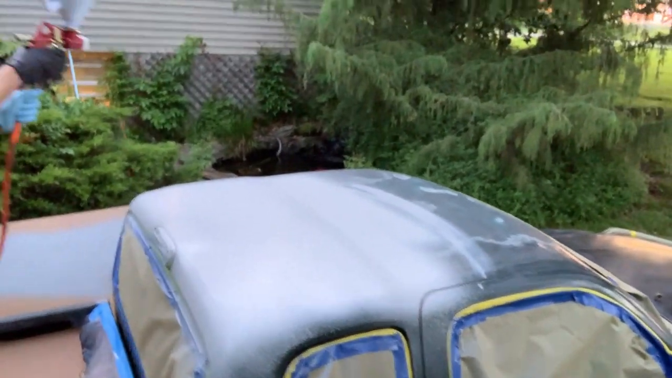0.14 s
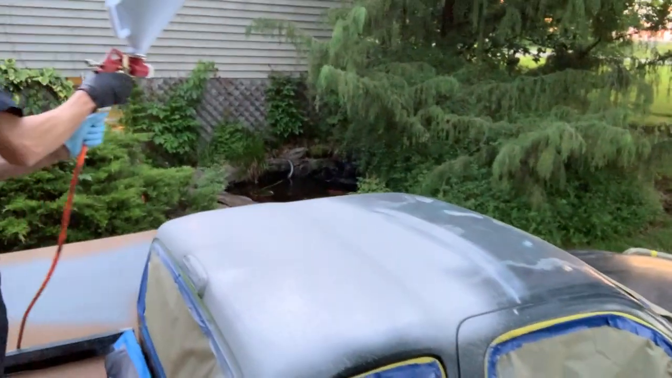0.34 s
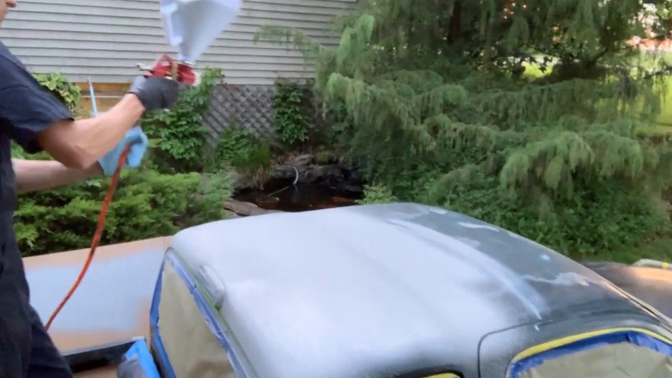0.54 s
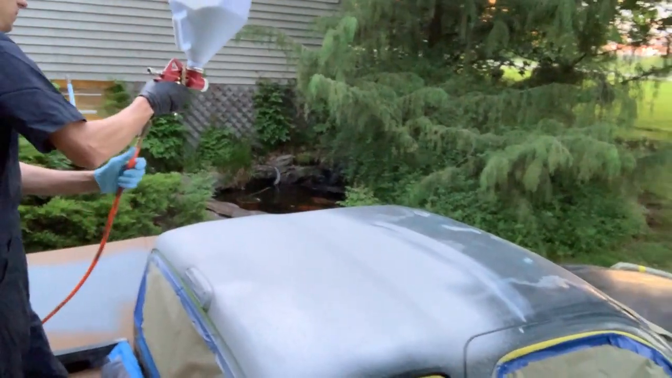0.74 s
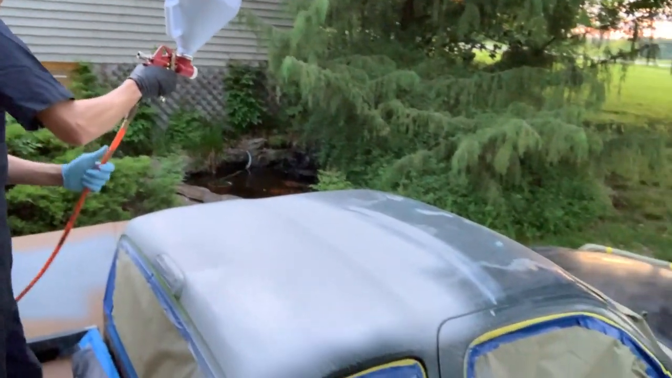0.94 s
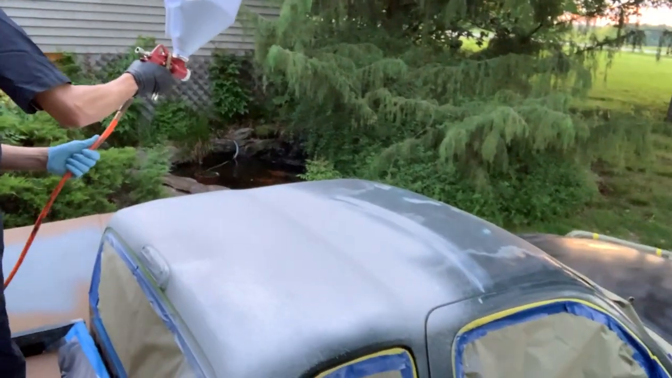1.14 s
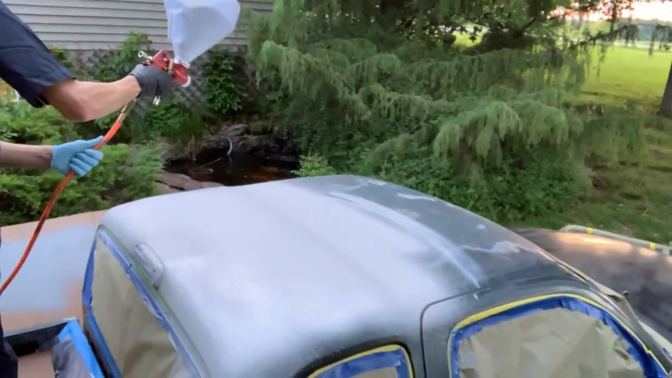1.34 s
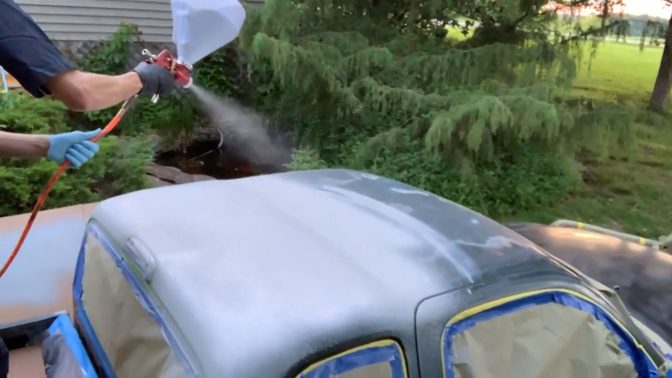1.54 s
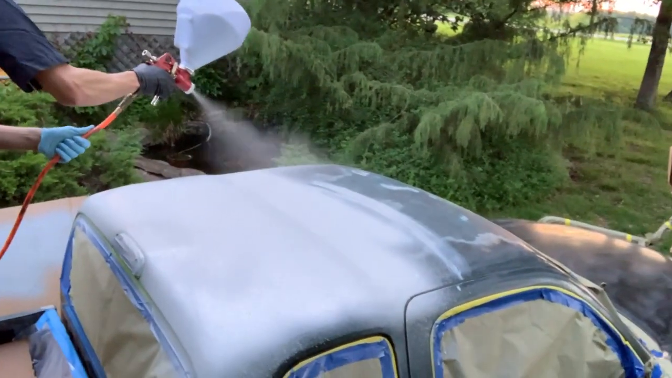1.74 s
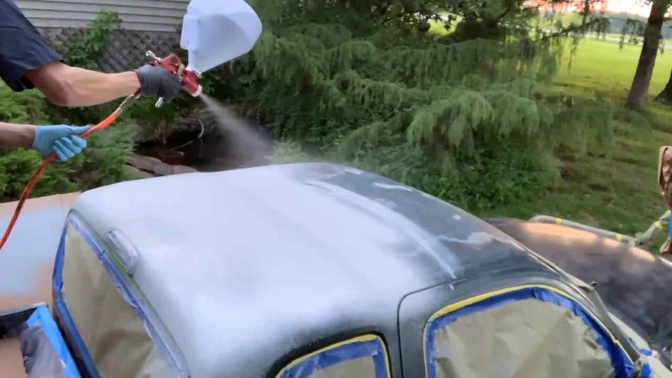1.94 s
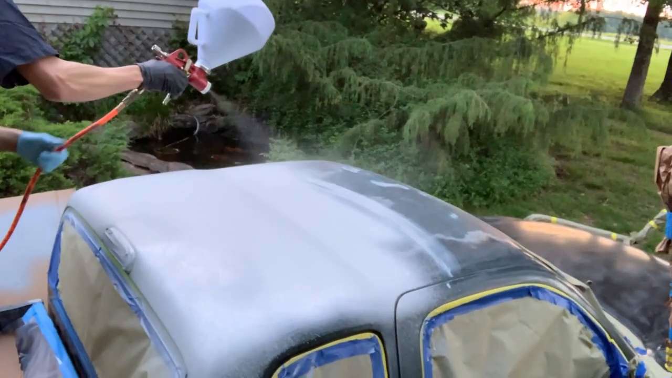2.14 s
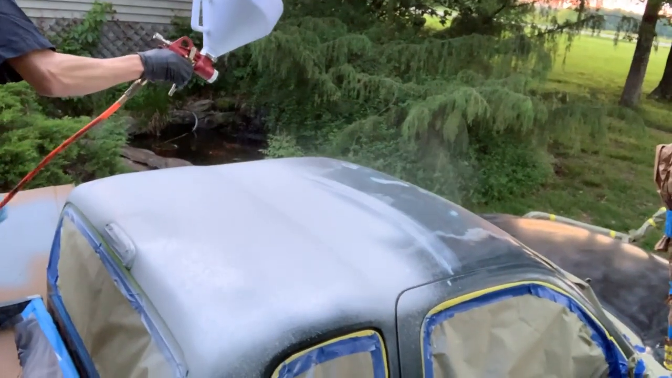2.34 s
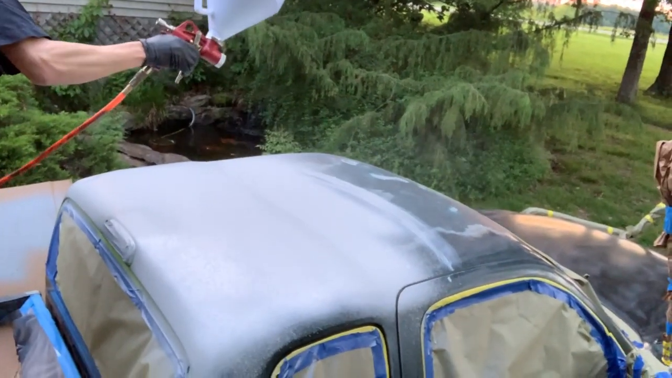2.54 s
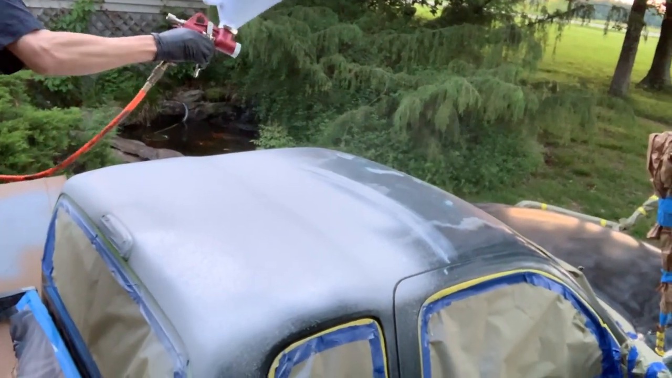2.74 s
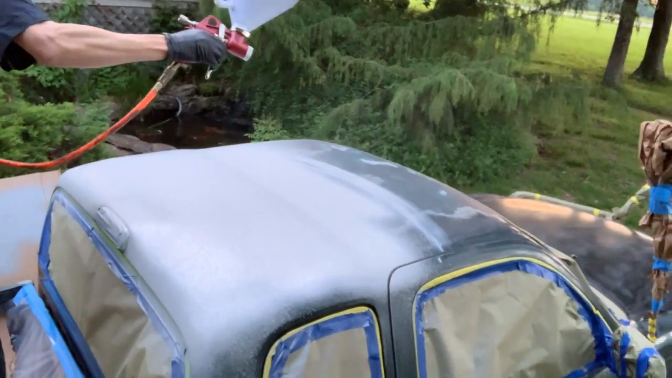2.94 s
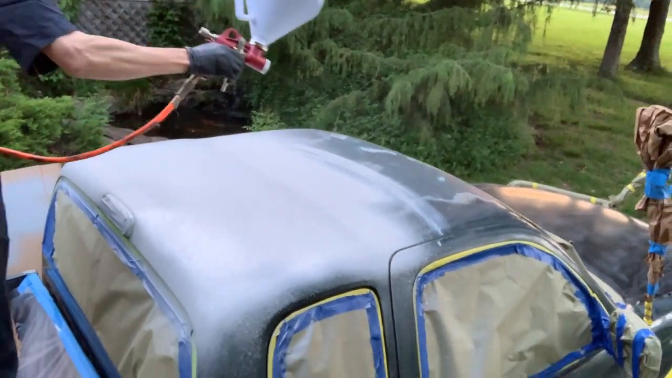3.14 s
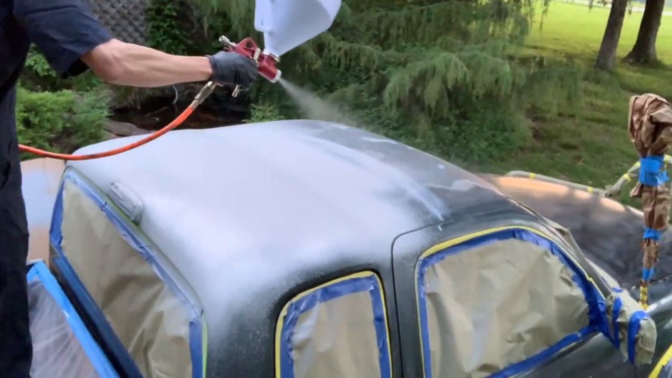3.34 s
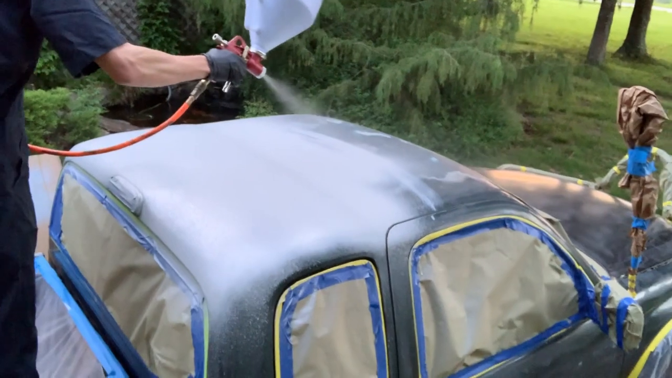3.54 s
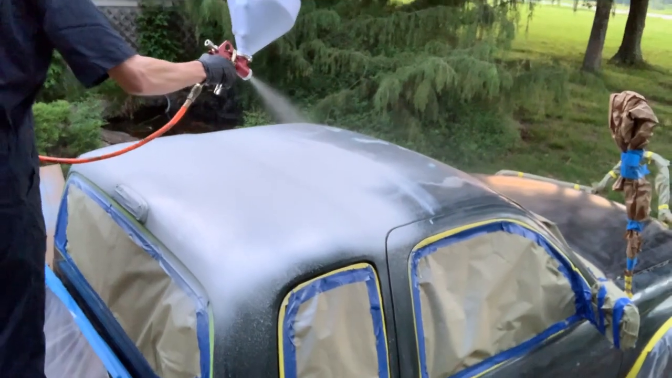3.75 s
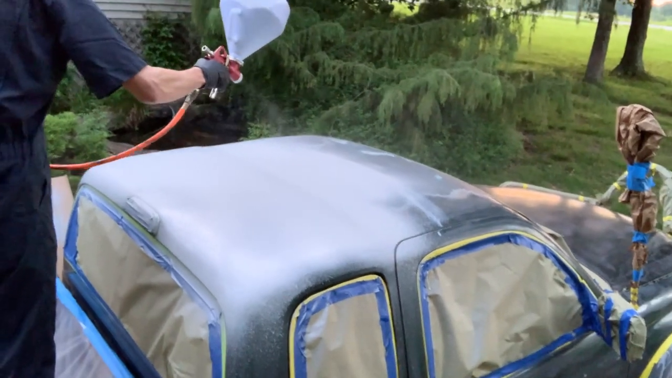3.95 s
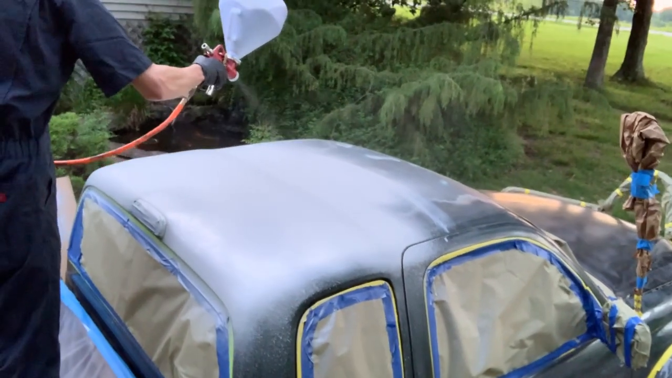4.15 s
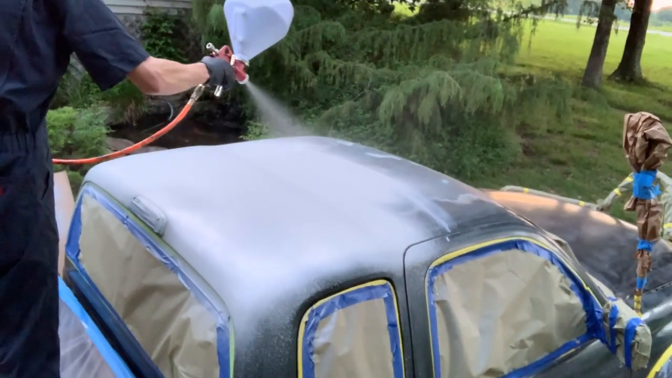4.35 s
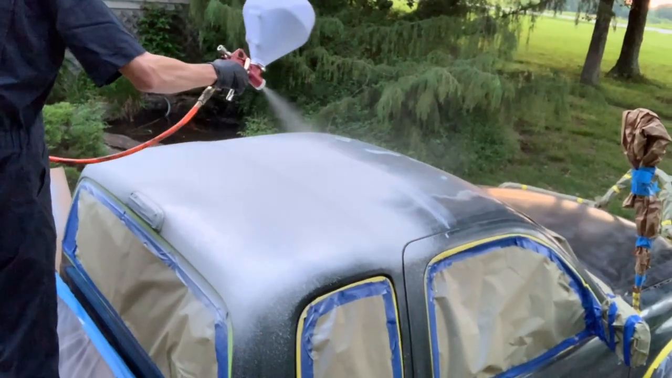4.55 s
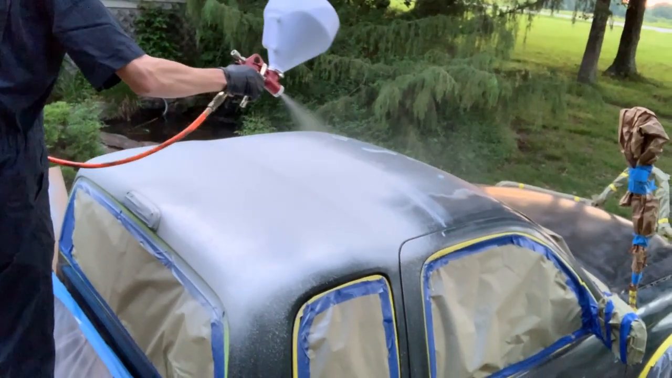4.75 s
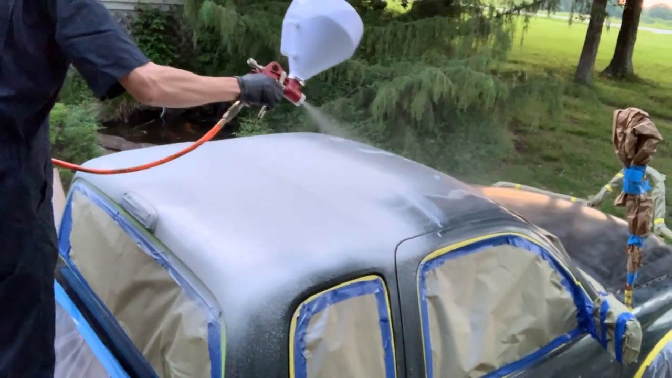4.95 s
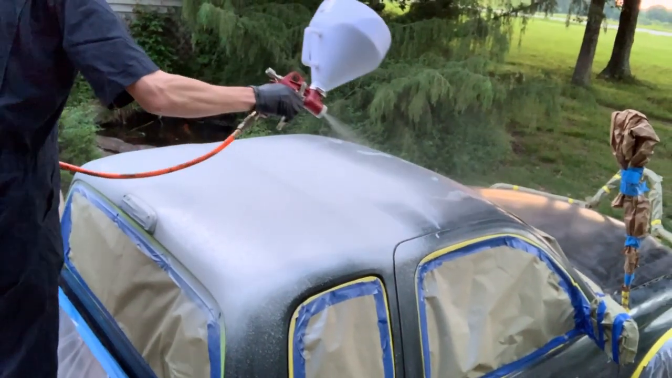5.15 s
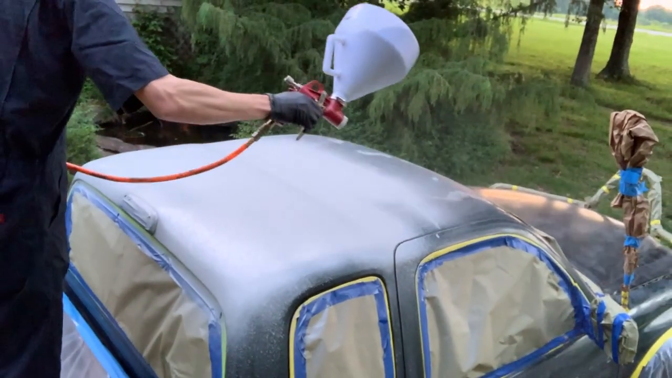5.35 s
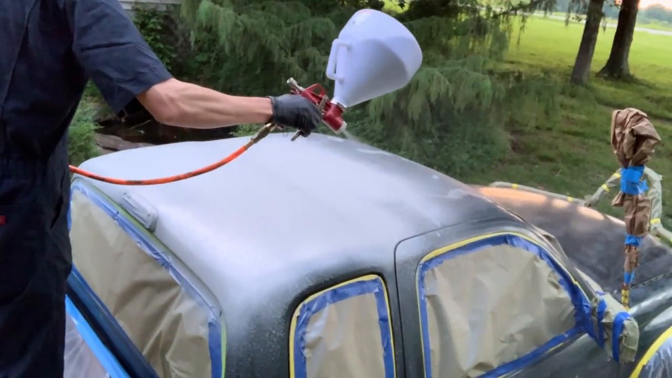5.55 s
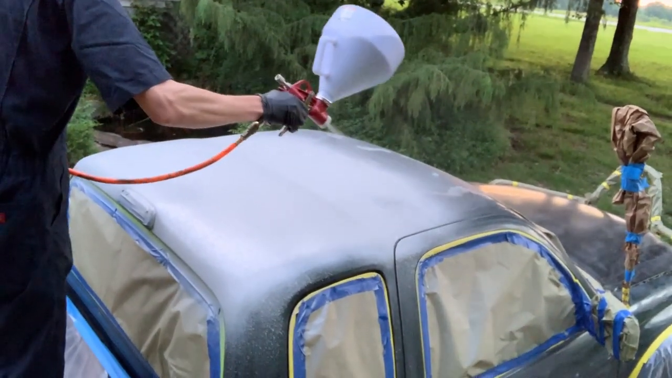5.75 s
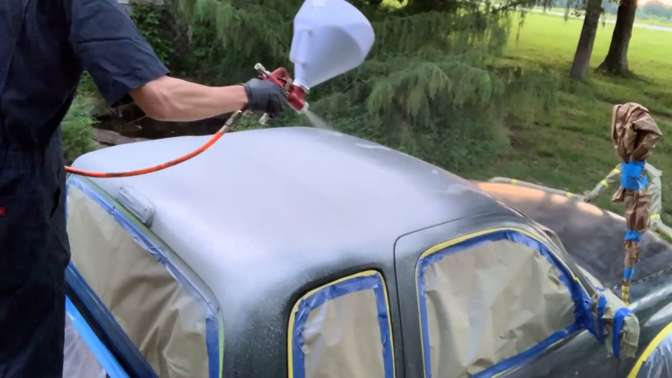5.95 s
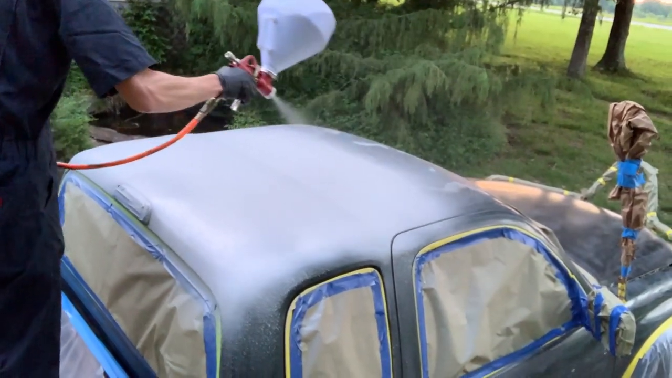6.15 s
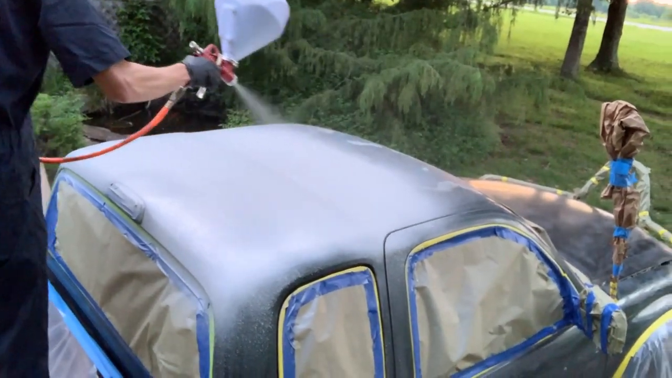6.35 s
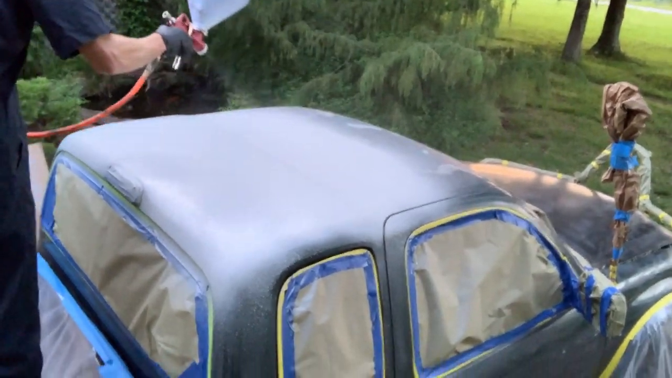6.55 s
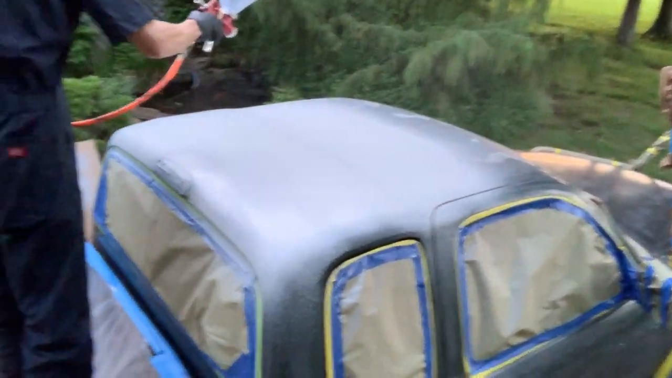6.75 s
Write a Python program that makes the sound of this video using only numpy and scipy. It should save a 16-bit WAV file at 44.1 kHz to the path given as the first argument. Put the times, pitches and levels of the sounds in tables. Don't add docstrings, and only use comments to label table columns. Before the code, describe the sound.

A close, hand-held microphone picks up continuous escaping air from a spray gun beside a masked car. After deep wobbling bumps and a quick rattle, one short spray burst fades softly, a small click follows, then three longer bursts come with brief gaps. The hiss shifts in colour with a slight moving, phasing roof reflection. Distant compressor hum and faint outdoor noise stay underneath; soft thumps return near the end.

```python
import sys
import numpy as np
from scipy import signal
from scipy.fft import rfft, irfft
from scipy.io import wavfile
from scipy.ndimage import map_coordinates

SR = 44100
rng = np.random.default_rng(int(sys.argv[2]) if len(sys.argv) > 2 else 0)


def wav_out(sig):
    wavfile.write(sys.argv[1], SR, np.round(np.clip(np.atleast_2d(sig).T, -1, 1) * 32767).astype(np.int16))


def gain_from_decibels(decibels):
    exponent = np.asarray(decibels, float) / 20
    return 10 ** exponent


N = 304290

# (time [s], hiss level [dB], turn towards the camera [0-1])
BLEED_AIR = [(0, -33.5, 0.15), (.94, -34.5, 0.3), (1.3, -31.5, 0.1), (1.6, -33, 0.28), (2.1, -30.5, 0.36),
             (2.8, -31.5, 0.14), (3.2, -30, 0.48), (3.6, -30, 0.68), (4.15, -34, 0.37), (4.45, -24, 0.5),
             (4.85, -33, 0.88), (5.3, -33, 0.33), (5.6, -31.5, 0.9), (6.0, -33.5, 0.98), (6.4, -40, 0.64),
             (6.9, -32.5, 0.1)]


def rms_one(x):
    return x / np.sqrt(np.mean(x ** 2) + 1e-20)


def in_time(rows):
    s, *columns = np.transpose(rows)
    return [np.interp(np.arange(N) / SR, s, c) for c in columns]


def noise(spectrum, low_hz, high_hz):
    hz = np.arange(N // 2 + 1) * SR / N
    points = np.array(spectrum, float)
    shape_db = np.interp(np.log(hz + 0.091), np.log(points[:, 0]), points[:, 1])
    lines = rfft(rng.standard_normal(N)) * gain_from_decibels(shape_db)
    inside = (hz > low_hz) & (hz < high_hz)
    return irfft(lines, N) * N / np.sqrt(2 * np.sum(np.abs(lines[inside]) ** 2))


def drift(rate_hz):
    r = np.exp(-80 * np.pi * rate_hz / SR)
    slow = signal.lfilter([1], [1, -2 * r, r * r], rng.standard_normal(N // 40 + 4002))
    slow = slow[4000:]
    return np.interp(np.arange(N) / 40, np.arange(len(slow)), rms_one(slow))


def band(x, low_hz, high_hz):
    return signal.sosfiltfilt(signal.butter(2, [low_hz, high_hz], "band", fs=SR, output="sos"), x)


def ring(clicks, hz, t60):
    r, w = gain_from_decibels(-60 / (t60 * SR)), 2 * np.pi * hz / SR
    return signal.lfilter([0, np.sin(w)], [1, -2 * r * np.cos(w), r * r], clicks + 1e-18)


def bell(x, hz, width_hz, db):
    a, w = np.sqrt(gain_from_decibels(db)), 2 * np.pi * hz / SR
    k = np.sin(w) * width_hz / hz / 2
    above = [1 + k * a, -2 * np.cos(w), 1 - k * a]
    below = [1 + k / a, -2 * np.cos(w), 1 - k / a]
    return signal.lfilter(above, below, x)


def garden():
    # (frequency [Hz], density [dB per Hz])
    outdoors = [(40, -8), (100, -1.5), (160, -10), (220, -6), (400, -16.5), (800, -3.5), (1500, -17),
                (4000, -21)]
    return gain_from_decibels(-52.5 + 2.0 * drift(9.5)) * noise(outdoors, low_hz=100, high_hz=1000)


def compressor():
    # (multiple of the stroke rate [1], level [dB rms], change once the camera has moved [dB])
    harmonics = [(2, -55, 0), (4, -58.5, 0), (6, -61, 2), (7, -62, 0), (8, -60, 2), (9, -62, 2),
                 (10, -57, -4), (11, -61, -3), (12, -56, 0), (13, -60, 0), (15, -50.5, -9)]
    move_s = (3.3, 3.7)
    stroke_hz, mains_hz, mains_db = 45.32, 120, -57
    t = np.arange(N) / SR
    moved = np.interp(t, move_s, [0, 1])
    lines = [(k * stroke_hz, db + late_db * moved) for k, db, late_db in harmonics]
    hum = np.zeros(N)
    for hz, db in lines + [(mains_hz, mains_db)]:
        hum += np.sqrt(2) * gain_from_decibels(db) * np.sin(2 * np.pi * hz * t + rng.uniform(0, 7.4))
    return gain_from_decibels(0.21 * drift(1.5)) * hum


def shake():
    # (time [s], sway level [dB], grip tremor level [dB])
    hand = [(0, -23, -41), (1.0, -25.5, -36), (1.8, -32, -34), (2.1, -28.5, -42), (4.1, -22.5, -43),
            (5.3, -30, -46.5), (6.2, -30, -43), (6.9, -26, -38)]
    # (time [s], half width [s], sway level [dB], grip tremor level [dB])
    jolts = [(.23, 0.042, -19, -26), (.44, 0.028, -15, -56), (.66, 0.053, -13.5, -24),
             (.86, 0.06, -17, -26), (1.32, 0.065, -31, -39), (1.68, .12, -30, -33), (2.55, 0.17, -37, -42),
             (3.3, 0.12, -33.5, -36), (3.54, 0.017, -24, -28), (6.48, 0.062, -16.5, -18),
             (6.7, 0.073, -18.5, -16), (6.9, 0.027, -19.5, -34)]
    t = np.arange(N) / SR
    sway_level, grip_level = gain_from_decibels(in_time(hand))
    for s, width_s, sway_db, grip_db in jolts:
        jolt = np.exp(-.5 * ((t - s) / width_s) ** 2)
        sway_level = sway_level + gain_from_decibels(sway_db) * jolt
        grip_level = grip_level + gain_from_decibels(grip_db) * jolt
    lumpy_db = 3.5 * drift(2.4)
    tremor_level = np.minimum(grip_level * gain_from_decibels(lumpy_db), gain_from_decibels(-30.5))
    sway = noise([(1, 4), (4, 0), (10, 4), (15, -0.5), (20, -17), (30, -52.5)], low_hz=1.9, high_hz=20)
    tremor = noise([(15, -61), (24, -8.0), (35, 1.5), (50, -8), (62, -30), (90, -77)],
                   low_hz=22, high_hz=52)
    rumble = noise([(35, -26), (55, -6.5), (85, -9.0), (100, -23), (150, -40)], low_hz=52, high_hz=100)
    return sway_level * sway + tremor_level * tremor + gain_from_decibels(-17) * grip_level * rumble


def thumps():
    # (time [s], push level [dB], upper modes [dB], direction [+1 or -1])
    pushes = [(0.182, -21, 9, 1), (0.222, -21.5, 9, 1), (0.609, 1, -4.5, -1), (0.714, -21, 0, 1),
              (6.426, -10, 7, 1), (6.465, -10, 2.5, -1), (6.49, -21, 6, -1), (6.508, -20, 2, 1),
              (6.611, -23, 5, 1), (6.685, -21, -3, -1), (6.885, -30, 2, -1)]
    # (frequency [Hz], level [dB], decay time t60 [s])
    modes = [(36.6, -3.5, 0.34), (54.6, -4, 0.16), (83.2, -22, 0.68), (143, -21, 0.18), (179, -18.5, 0.21)]
    s, push_db, upper_db, direction = np.transpose(pushes)
    at, out = np.round(s * SR).astype(int), np.zeros(N)
    for k, (hz, db, t60) in enumerate(modes):
        clicks = np.zeros(N)
        clicks[at] = np.sign(direction) * gain_from_decibels(push_db + db + upper_db * (k > 0))
        out += ring(clicks, hz, t60)
    return signal.sosfilt(signal.butter(3, 130, fs=SR, output="sos"), out)


def knocks():
    # (time [s], peak level [dB], low mode [Hz], high mode [Hz], high mode level [dB])
    hits = [(.7108, -11.5, 263, 790, -4), (0.7173, -16.5, 504, 900, -2), (0.729, -32, 230, 420, -3),
            (.752, -21.5, 160, 520, -8), (.768, -32, 250, 600, -6), (.7858, -22, 520, 1220, -2),
            (.792, -29, 300, 815, 7), (.802, -37, 350, 700, -6), (.832, -33, 307, 900, 0),
            (.855, -26, 160, 596, -6), (1.712, -26, 182, 400, -10), (2.441, -14.5, 1440, 2070, -3),
            (2.442, -34, 620, 950, 0), (2.4453, -16.5, 265, 316, -9), (2.4605, -23, 173, 432, -4),
            (2.468, -28, 181, 503, -1), (2.49, -33, 200, 1100, 4), (2.512, -42, 280, 1800, -1),
            (3.101, -35.5, 199, 610, 3), (3.32, -29, 324, 500, -8), (3.824, -30, 229, 400, 4)]
    out, size = np.zeros(N), SR // 5
    for s, db, low_hz, high_hz, high_db in hits:
        click = np.zeros(size)
        click[0] = 1
        t60 = .013 + 4.0 / low_hz + .0008 * max(-20 - db, 0)
        rattle = 0.054 * rng.standard_normal(size) * np.exp(-np.arange(size) / (0.0073 * SR))
        blow = click + rattle
        hit = ring(blow, low_hz, t60) + gain_from_decibels(high_db) * ring(blow, high_hz, 0.55 * t60)
        at = round(s * SR)
        out[at:at + size] += gain_from_decibels(db) * hit
    return signal.sosfilt(signal.butter(2, 2800, fs=SR, output="sos"), out)


def path_ms():
    # (time [s], extra path of the bounce [ms])
    sweep = [(.55, 1.41), (1.18, 1.059), (1.55, .845), (1.92, .756), (2.3, .895), (2.68, 1.164),
             (2.92, 1.242), (3.18, 1.067), (3.42, .808), (3.65, .7), (3.9, .677), (4.5, .67), (4.88, .757),
             (5.25, .95), (5.47, 1.045), (5.75, .877), (6.15, .72), (6.9, .6)]
    s, ms = np.transpose(sweep)
    place = np.interp(np.arange(N) / SR, s, np.arange(len(s)))
    k = np.minimum(place.astype(int), len(s) - 2)
    u, step = place - k, np.diff(s)[k]
    chord = np.pad(np.diff(ms) / np.diff(s), 1, "edge")
    slope = 2 * np.maximum(chord[1:] * chord[:-1], 0) / (chord[1:] + chord[:-1])
    ease = u * u * (3 - 2 * u)
    bend = (1 - u) * slope[k] - u * slope[k + 1]
    return ms[k] + ease * (ms[k + 1] - ms[k]) + step * u * (1 - u) * bend


def trigger():
    # (opens [s], pull time [s], let go [s], release time constant [s])
    pulls = [
        (1.515, .018, 2.15, .11),
        (3.19, .075, 3.915, .022),
        (4.2, .07, 5.265, .025),
        (5.445, .05, 6.54, .04),
    ]
    pull_db = [-24, -23, -23.5, -23.5]
    linger_share, linger_s = 0.4, .11
    settle_db, settle_s = -1, 0.072
    t, opening, spray = np.arange(N) / SR, np.zeros(N), np.zeros(N)
    for (opens, pull_s, let_go, release_s), db in zip(pulls, pull_db):
        shut = np.maximum(t - let_go, 0)
        fall = (1 - linger_share) * np.exp(-shut / release_s) + linger_share * np.exp(-shut / linger_s)
        pull = np.clip((t - opens) / pull_s, 0, 1) ** 2 * fall
        opening += pull
        spray += pull * gain_from_decibels(db + settle_db * np.exp(-np.maximum(t - opens, 0) / settle_s))
    return np.minimum(opening, 1), spray


def jet(opening, spray, lag_ms):
    # (frequency [Hz], density [dB per Hz])
    nozzle = [(700, -15.5), (1100, -14.5), (1400, -5.5), (1750, -1.5), (2500, 1), (3700, 4.5), (4400, 5.5),
              (5600, -3), (6400, -1.15), (7250, 3), (9400, 2), (10200, -1), (11500, -5.5), (15700, -10)]
    # (frequency [Hz], density [dB per Hz])
    droplets = [(150, -35), (300, -4), (600, -1), (1100, 3.5), (1600, 3), (2500, -13)]
    bleed_db, turn = in_time(BLEED_AIR)
    raised = np.maximum(opening, turn ** 2) * (lag_ms - 0.88)
    body_rest_db, body_spray_db = -0.2, 0.95
    body_db = body_rest_db + (body_spray_db - body_rest_db) * opening
    body_db = body_db + 8.5 * raised + 2 * (turn - .5)
    top_rest_db, top_spray_db = -4.5, -6
    top_db = top_rest_db + (top_spray_db - top_rest_db) * opening + 16 * raised

    air = noise(nozzle, low_hz=5110, high_hz=10800)
    air = air + (gain_from_decibels(-3 + 5 * turn) - 1) * band(air, 3500, 4600)
    body, top = band(air, 300, 4700), band(air, 10800, 19000)
    body_gain = gain_from_decibels(body_db + 0.81 + 0.19 * drift(0.77))
    top_gain = gain_from_decibels(top_db + 7.5)
    level = (1 - opening) * gain_from_decibels(bleed_db) + spray * gain_from_decibels(-3 * raised)
    hiss = level * (air + (body_gain - 1) * body + (top_gain - 1) * top)

    roar_level = (1 - opening) * gain_from_decibels(-48.5) + opening * gain_from_decibels(-39.5)
    roar_db = 0.28 * drift(26) + 0.75 * drift(4.4) + 4 * turn + raised
    roar = roar_level * gain_from_decibels(roar_db) * noise(droplets, low_hz=332, high_hz=1100)
    flutter = gain_from_decibels(0.22 * drift(12) + 0.27 * drift(37) + 0.55 * drift(240))
    return flutter * (hiss + roar)


def off_roof(x, opening, lag_ms):
    echo_db = -7.5 - 19 * np.maximum(lag_ms - .72, 0)
    echo_db = echo_db - 4 * (1 - opening) * in_time(BLEED_AIR)[1]
    share = .95 * gain_from_decibels(echo_db)
    returned = signal.sosfilt(signal.butter(1, 1200, "high", fs=SR, output="sos"), x)
    echo = map_coordinates(returned, [np.arange(N) - lag_ms * SR / 1000], order=3, mode="mirror")
    return (x + share * echo) / np.sqrt(1 + share ** 2)


def scene():
    (opening, spray), lag_ms = trigger(), path_ms()
    spray_gun = off_roof(jet(opening, spray, lag_ms), opening, lag_ms)
    mono = garden() + compressor() + shake() + thumps() + knocks() + spray_gun
    return np.stack([mono, mono])


def splits(heard):
    # (time [s], low edge [Hz], high edge [Hz])
    puffs = [(.029, 8500, 12000), (.18, 4500, 5900), (.18, 13000, 14700), (.285, 11000, 12600),
             (.482, 9600, 11300), (.563, 4500, 5900), (.854, 4000, 6500), (.97, 5700, 7800),
             (1.213, 11000, 15300), (2.746, 4100, 12000), (2.943, 6200, 7800), (2.99, 5100, 9800),
             (3.384, 6200, 11800), (3.408, 4500, 5900), (3.408, 11000, 12600), (3.443, 9600, 11300),
             (5.196, 11000, 12600), (5.312, 6700, 8400), (5.347, 5100, 11300), (5.95, 5600, 7100),
             (6.171, 7500, 9200)]
    out, size = np.zeros(N), 1600
    for s, low_hz, high_hz in puffs:
        puff = rms_one(band(band(rng.standard_normal(size), low_hz, high_hz), low_hz, high_hz))
        at = round(s * SR) - size // 2
        strength = gain_from_decibels(-1.5) * np.std(band(heard[at:at + size], low_hz, high_hz))
        out[at:at + size] += strength * puff * np.hanning(size)
    return out * [[1], [-1]]


def band_limit(x):
    return signal.sosfilt(signal.butter(12, 16520, fs=SR, output="sos"), x)


def record(dry):
    # (frequency [Hz], width [Hz], level [dB])
    housing = [(4020, 580, 2), (4710, 347, -9.5), (5060, 200, 1), (8870, 790, 1.5)]
    for hz, width_hz, db in housing:
        dry = bell(dry, hz, width_hz, db)
    top_cut = signal.ellip(12, .3, 80, 15730, fs=SR, output="sos")
    mix = signal.sosfilt(top_cut, dry + splits(dry[0]))
    return band_limit(mix)


dry = scene()
out = record(dry)
wav_out(out)
```